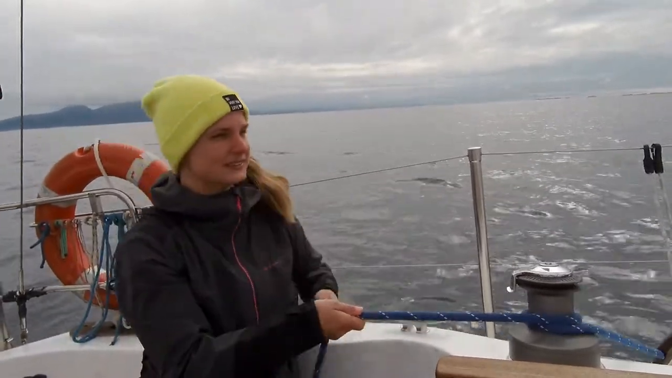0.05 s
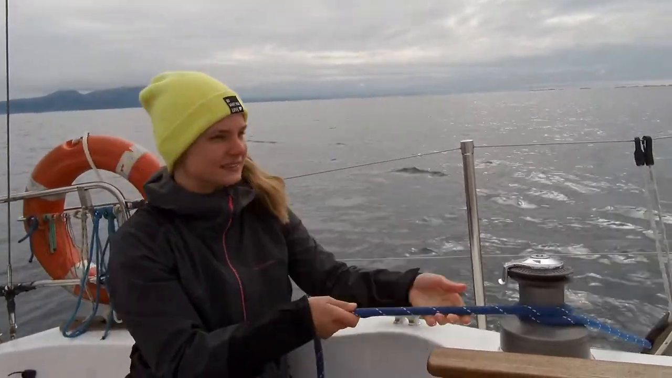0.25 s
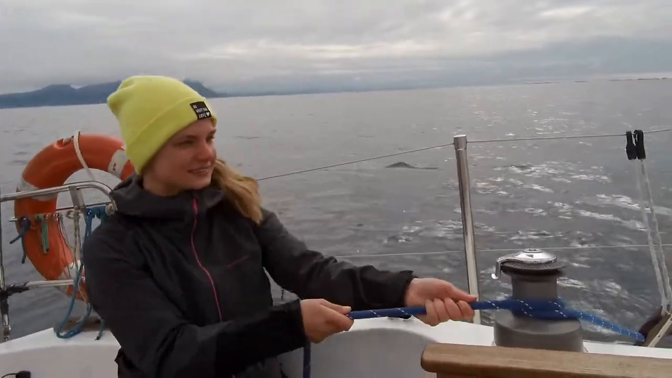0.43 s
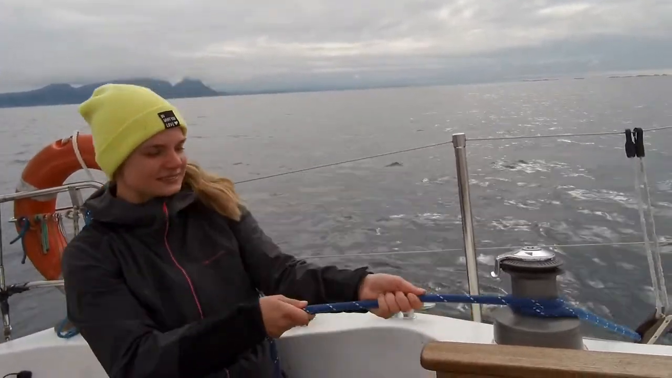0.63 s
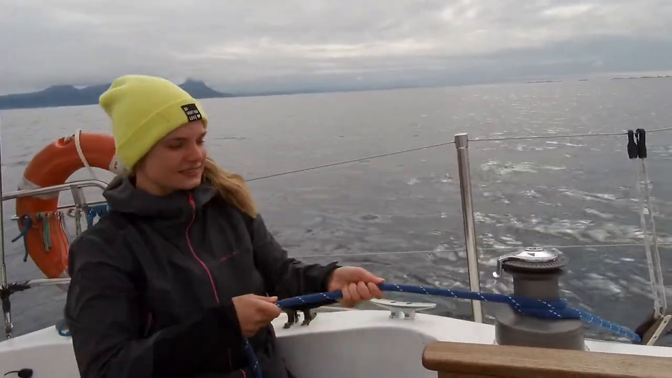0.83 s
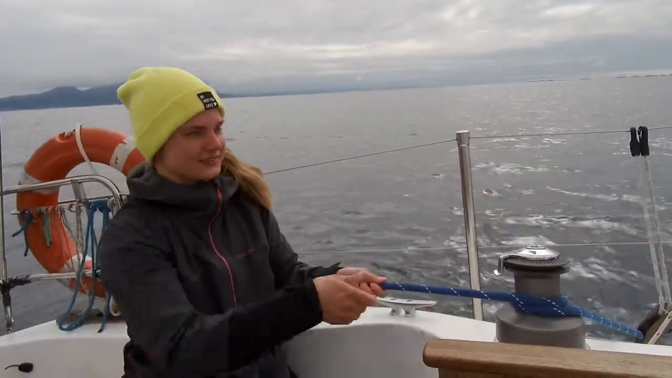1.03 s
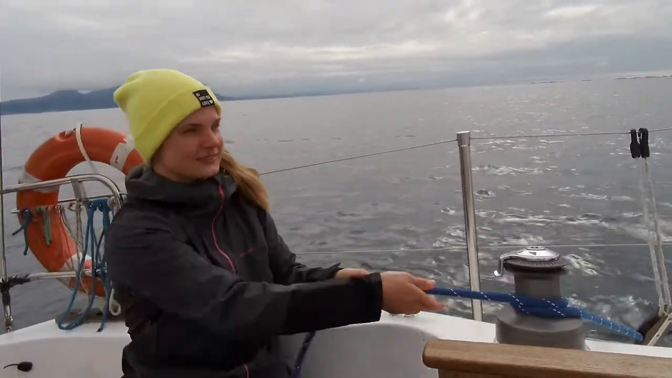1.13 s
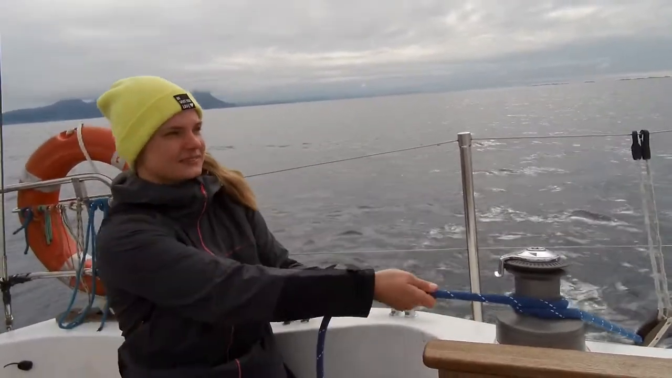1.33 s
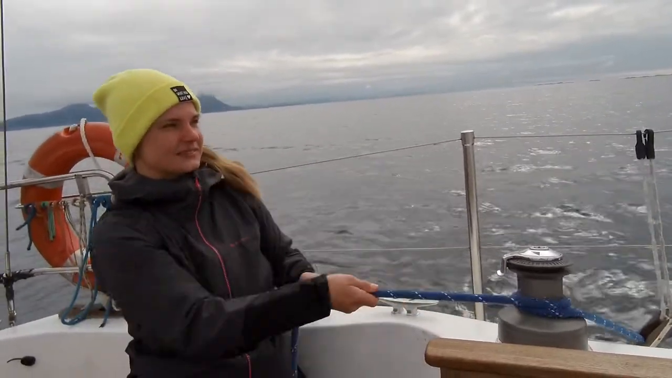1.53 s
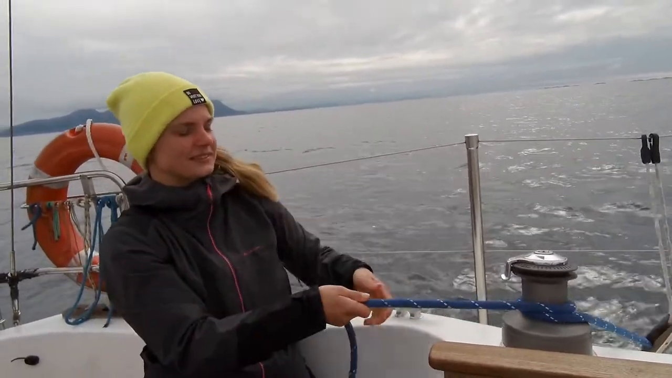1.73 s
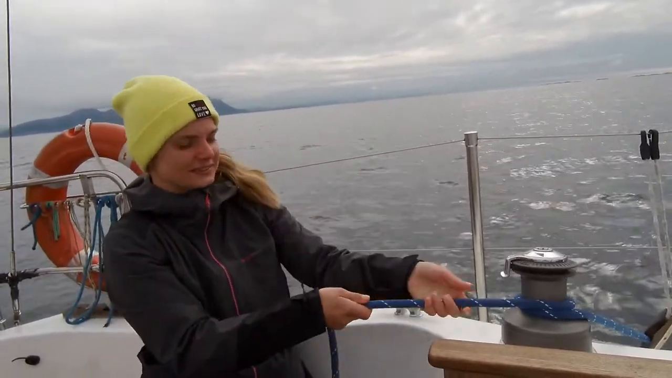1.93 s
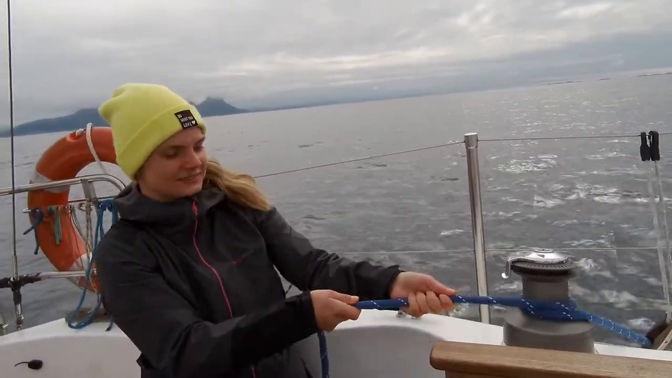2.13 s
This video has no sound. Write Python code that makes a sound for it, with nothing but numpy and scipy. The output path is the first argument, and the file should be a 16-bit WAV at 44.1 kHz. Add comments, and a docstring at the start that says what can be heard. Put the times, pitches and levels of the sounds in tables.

```python
"""Sheet winch on a sailing boat

The winch is hauled in two pulls: pawls click over the teeth, ring the metal drum and knock the hollow deck.
Cracks are short noise bursts; drum and deck are sums of fading sine tones; bearings are grainy noise.
Hands and sleeves rustle along the rope (banded noise), and rope and hull thump (short low tones).
A low engine rumble, a water wash and a faint hiss, all shaped noise, lie under it.
"""
import sys
import numpy as np
from scipy import signal
from scipy.fft import rfft, irfft, next_fast_len
from scipy.io import wavfile
from scipy.ndimage import map_coordinates

SR = 44100
rng = np.random.default_rng(int(sys.argv[2]) if len(sys.argv) > 2 else 0)


def materialize(psi):
    """Save the field psi as 16-bit PCM at rate SR to the path in sys.argv[1].

    A 1-D psi becomes a single channel; in a 2-D psi each row is a channel.
    """
    bounded = np.clip(np.atleast_2d(psi).T, -1, 1)
    quanta = np.round(bounded * 32767).astype(np.int16)
    wavfile.write(sys.argv[1], SR, quanta)


N = 94815


def amp(db):
    """Turn decibels into a plain multiplier."""
    return 10 ** (np.asarray(db) / 20)


def unit(x):
    """Scale x to an rms level of 1."""
    return x / np.sqrt(np.mean(x ** 2) + 1e-20)


def curves(rows, outside_db=-120):
    """Join the rows by straight lines: one value per sample for each column after the time."""
    time_s, *columns = np.transpose(rows)
    return [np.interp(np.arange(N) / SR, time_s, column, outside_db, outside_db) for column in columns]


def wobble(rate):
    """A smooth random curve with `rate` random points a second."""
    points = rng.standard_normal(int(N * rate / SR) + 4)
    return map_coordinates(points, [np.arange(N) * rate / SR])


def filtered(x, response):
    """Weight the frequencies of x by response(frequency in Hz)."""
    m = next_fast_len(len(x) + 8192)  # spare room keeps the filter's tail from wrapping round
    return irfft(rfft(x, m) * response(np.fft.rfftfreq(m, 1 / SR)), m)[:len(x)]


def noise(spectrum, lumpy_db, rate):
    """Noise of rms 1 whose colour follows the spectrum and whose level flutters."""
    f, level_db = np.transpose(spectrum)
    grains = amp(lumpy_db * wobble(rate)) * rng.standard_normal(N)
    colour = lambda hz: amp(np.interp(np.log(hz + 1), np.log(f + 1), level_db))
    return unit(filtered(grains, colour))


def resonances(peaks):
    """A response that boosts narrow bands, as a body does at its own pitches; signs alternate."""
    def response(f):
        total = 0
        for k, (centre, width, db) in enumerate(peaks):
            peak = 1j * f * width / (centre * centre - f * f + 1j * f * width)
            total = total + (-1) ** k * amp(db) * peak
        return total
    return response


def ring(modes, t, rise, scatter_db):
    """A struck body sounds several fading tones, wavering and a little different at each blow."""
    wander_s = 0.00005  # how far the timing of the cycles drifts, so that the pitch wavers
    scatter = rng.standard_normal((len(modes), 3))
    grid = np.meshgrid(np.arange(len(modes)), t * 120, indexing="ij")  # 120 random points a second
    waver = map_coordinates(rng.standard_normal((len(modes), 20)), grid, order=1)
    total = np.zeros(len(t))
    for k, (hz, db, t60) in enumerate(modes):
        louder, sharper, longer = scatter[k]
        level_db = db + scatter_db * (louder / 2 + waver[k])
        fade_db = -60 * t / (t60 * amp(scatter_db * longer / 2))
        cycles = hz * ((1 + 0.004 * sharper) * t + wander_s * waver[-1 - k])
        total += amp(level_db + fade_db) * np.sin(2 * np.pi * cycles)
    return total * (1 - np.exp(-t / rise))


def add(out, s, x):
    """Mix x into out from time s."""
    part = out[max(round(s * SR), 0):][:len(x)]
    part += x[:len(part)]


def background():
    """Lumpy engine rumble with a steady hum, water wash and hiss: each is noise of its own colour."""
    # changing levels: time_s, rumble_db, wash_db, hiss_db
    ground = [(0.0, -32.5, -40.5, -50), (0.16, -38.5, -44.5, -52), (0.29, -38, -46.5, -53),
              (0.56, -32, -43, -50.5), (0.65, -28, -51, -45.5), (0.77, -25.5, -28.5, -40),
              (0.83, -27, -38.5, -43), (0.95, -31.5, -42, -50.5), (1.26, -34, -40.5, -51),
              (1.4, -35.5, -41.5, -54.5), (1.5, -27.5, -56, -43.5), (1.63, -32, -41.5, -49.5),
              (1.81, -35, -46.5, -56.5), (1.93, -34.5, -44.5, -58.5), (2.15, -38.5, -46, -53.5)]
    # colour of the engine rumble: pitch_hz, level_db (per Hz, relative)
    rumble_colour = [(13, -47), (30, -12), (50, -9.5), (87, -1), (113, -10), (167, -6), (264, -9),
                     (296, -9), (338, -21.5), (375, -29), (500, -51), (650, -20), (1100, -120)]
    # colour of the water wash: pitch_hz, level_db (per Hz, relative)
    wash_colour = [(190, -37), (330, -1.5), (1090, -12), (1290, -11), (1380, -12.5), (1770, -22.5),
                   (2500, -30.5), (3250, -57), (5500, -120)]
    # colour of the hiss: pitch_hz, level_db (per Hz, relative)
    hiss_colour = [(1180, -6), (2000, -1.5), (3350, -0.5), (3880, -5), (5110, 0.5), (7200, -1.5),
                   (13500, -2), (15600, -7.5)]
    hum_hz, hum_width_hz, hum_db = 88.8, 7.9, -38.5  # engine hum

    rumble_level, wash_level, hiss_level = amp(curves(ground, outside_db=-45))
    hum = unit(filtered(rng.standard_normal(N), resonances([(hum_hz, hum_width_hz, 0)])))
    rumble = rumble_level * noise(rumble_colour, lumpy_db=2, rate=54)
    wash = wash_level * noise(wash_colour, lumpy_db=4.0, rate=34)
    hiss = hiss_level * noise(hiss_colour, lumpy_db=2, rate=25)
    return rumble + amp(hum_db) * hum + wash + hiss


def rustles():
    """Hands and sleeves rub cloth and rope: grainy noise in two bands, and the sliding rope hums."""
    # one list per rustle: time_s, middle_db, treble_db
    rustle_levels = [
        [(0.0, -63, -61), (0.006, -78, -56), (0.016, -63, -71), (0.032, -98, -59), (0.042, -81, -81),
         (0.05, -44.5, -40), (0.068, -72, -68), (0.08, -77, -60)],
        [(0.17, -67, -71), (0.192, -44, -50), (0.206, -34.5, -31.5), (0.236, -39, -45.5), (0.298, -38.5, -49),
         (0.312, -39, -30), (0.346, -49.5, -58), (0.36, -55, -51)],
        [(0.93, -71, -57), (0.944, -70, -56), (0.956, -78, -44), (0.964, -65, -44), (0.974, -80, -49),
         (0.992, -67, -51.5), (1.004, -79, -58), (1.05, -53.5, -51.5), (1.1, -70, -52.5)],
        [(1.77, -75, -71), (1.782, -65, -76), (1.79, -45, -50), (1.851, -68, -65), (1.855, -38.5, -34.5),
         (1.872, -37, -40), (1.914, -42, -49), (1.936, -54.5, -59), (1.946, -43.5, -46.5), (1.99, -59, -64)],
    ]
    # colour of the middle band: pitch_hz, level_db (per Hz, relative)
    middle_colour = [(290, -53), (500, -80), (662, -11), (1020, -6), (1290, -6.5), (1690, -7.5),
                     (2960, -10.5), (3220, -8), (6000, -15), (7800, -55), (13200, -120)]
    # colour of the treble band: pitch_hz, level_db (per Hz, relative)
    treble_colour = [(3240, -17), (5500, -1), (7210, 0.5), (7870, 5), (9210, 1.5), (10600, 2.5),
                     (15600, -7.5)]
    rope_hz, rope_width_hz, rope_db = 664, 24, -4  # hum level is relative to the middle band

    middle = noise(middle_colour, lumpy_db=1.7, rate=400)
    rope = unit(filtered(rng.standard_normal(N), resonances([(rope_hz, rope_width_hz, 0)])))
    middle = middle + amp(rope_db) * rope
    treble = noise(treble_colour, lumpy_db=1.7, rate=500)
    return sum(amp(mid_db) * middle + amp(top_db) * treble for mid_db, top_db in map(curves, rustle_levels))


def thumps():
    """Rope and hull thump: a low fading tone with a sharp first dip, and a dull slap of noise."""
    # thumps of rope and hull: start_s, push_db, pitch_hz, slap_db (of half the slap's peak)
    thump_list = [(0.014, -28, 170, -28), (0.058, -40, 122, -36), (0.216, -31, 276, -51),
                  (0.248, -28, 187, -51), (0.383, -21.5, 151, -42.5), (0.519, -21.5, 125, -39),
                  (0.944, -26, 198, -32), (0.9626, -15, 298, -30.5), (1.0138, -19.5, 390, -43),
                  (1.051, -27, 121, -32.5), (1.152, -39, 118, -40), (1.184, -10, 124, -39),
                  (1.249, -20.5, 201, -50), (1.275, -21.5, 122, -27.5), (1.334, -19, 143, -28),
                  (1.464, -17, 118, -52), (1.766, -31, 277, -41), (1.949, -34.5, 208, -33.5),
                  (2, -32, 209, -61)]
    fade_cycles = 4  # the tone fades by 30 dB in this many cycles
    jolt_cycles, jolt_db = 0.13, -3.5  # width of the first dip, and its depth relative to the tone
    slap_t60_s, slap_hz = 0.036, 1070  # time to fade by 60 dB, and where the treble starts to fall

    out, t = np.zeros(N), np.arange(SR // 10) / SR
    for s, push_db, hz, slap_db in thump_list:
        tone = np.sin(2 * np.pi * (hz * t - 3 * jolt_cycles))
        push = tone * amp(-30 * t * hz / fade_cycles) * (1 - np.exp(-t / 0.0019))
        u = t * hz / jolt_cycles - 3  # distance from the middle of the dip, in widths
        push = push - amp(jolt_db) * (1 - u ** 2) * np.exp(-u ** 2 / 2)
        burst = amp(-60 * t / slap_t60_s) * rng.standard_normal(len(t))
        slap = filtered(burst, lambda f: 1 / (1 + 1j * f / slap_hz) ** 3)
        add(out, s, amp(push_db) * push + amp(slap_db) * 2 * slap / np.abs(slap).max())
    return out


def bearings():
    """The turning drum rolls on its bearings: grainy noise coloured by deck and drum, plus hiss."""
    # one list per turn of the drum: time_s, level_db
    turns = [
        [(0.59, -40), (0.754, -22.5), (0.838, -35), (0.92, -46)],
        [(1.41, -57), (1.468, -34), (1.55, -24.5), (1.68, -35)],
    ]
    # tones of deck and drum that the rolling excites: pitch_hz, width_hz, level_db (relative)
    body_peaks = [(396, 32.4, 2), (547, 27, -2.5), (752, 58, -7), (1140, 29, -9.5), (1345, 51, -9.5),
                  (1444, 78, -9), (1542, 61, -7), (3080, 54, -38), (6940, 55, -19.5), (11270, 240, -22.5)]
    hiss_db = -16.5  # relative to the coloured noise

    def grit():
        return amp(6.9 * wobble(150)) * rng.standard_normal(N)

    body = unit(filtered(grit(), resonances(body_peaks)))
    hiss = unit(np.diff(grit(), prepend=0))  # differences between samples favour the treble
    level = sum(amp(curves(rows)[0]) for rows in turns)
    return level * (body + amp(hiss_db) * hiss)


def drum():
    """A short gritty scrape excites the drum's tones, which are damped after the length of each ring."""
    # rings of the drum: start_s, level_db, upper_over_lower_db, middle_db, length_s
    ring_list = [(0.675, -26, 15, -26, 0.0097), (0.693, -22, -11, -19, 0.015),
                 (0.734, -24.5, 6.5, -23.5, 0.027), (0.743, -23, -22, -25, 0.024),
                 (0.762, -33.5, 15, -20, 0.025), (0.788, -22, 11, -23, 0.004),
                 (0.804, -19, -9, -23.5, 0.014), (0.831, -28, -8, -26, 0.012),
                 (.855, -22.5, 0.5, -26.5, 0.016), (1.339, -37, 1, -29, 0.0058),
                 (1.529, -24, -4, -21.5, 0.0035), (1.551, -33, 0, -31, 0.012),
                 (1.564, -33.5, 6.5, -37, 0.021), (1.602, -34, -15, -34, 0.009),
                 (1.64, -28, -9, -28, 0.014), (1.708, -50, -3, -34, 0.005), (2.008, -44, -3, -38, 0.005)]
    # high tones: pitch_hz, level_db (relative), t60_s (fade by 60 dB), share (of upper_over_lower_db)
    high_modes = [(3020, -13.5, 0.041, 0), (3760, -18, 0.14, 0.33), (4340, -18, 0.3, 0.18),
                  (5226, -2.5, 0.093, 0.035), (5370, -5, 0.05, 0.15), (7065, -6.5, 0.11, 0.68),
                  (7120, -10.5, 0.037, 0.65), (9000, -12.5, 0.062, 0.18), (9900, -16, 0.037, 0.7),
                  (11200, -17, .04, 0.3), (5620, -9.5, 0.025, 0.043), (3590, -16.5, 0.14, 0.67),
                  (6590, -5.5, 0.023, 0.46)]
    # middle tones: pitch_hz, level_db (relative), t60_s (fade by 60 dB)
    middle_modes = [(1317, 2.5, 0.074), (1426, 5, 0.031), (1578, -3, 0.039), (1140, -6, 0.03),
                    (2124, -11, 0.038)]
    rise_s, damp_s, damped_db = 0.002, 0.004, -7  # swelling time, damping time, drop once damped
    scrape_s, scrape_db = 0.003, -14  # strike's fading time; friction noise relative to the ring's level

    out, t = np.zeros(N), np.arange(SR // 8) / SR
    for s, level_db, upper_db, mid_db, length in ring_list:
        tuned = [(hz, db + share * upper_db, t60) for hz, db, t60, share in high_modes]
        high = ring(tuned, t, rise_s, scatter_db=3.0)
        middle = ring(middle_modes, t, rise_s, scatter_db=2.5)
        modes = amp(level_db) * high + amp(mid_db) * middle
        grit = rng.standard_normal((2, len(t)))
        strike = grit[0] ** 3 * np.exp(-t / scrape_s)  # cubing makes a few grains stand out
        struck = signal.fftconvolve(modes, strike / np.linalg.norm(strike))[:len(t)]
        friction = grit[1] * np.exp(-t / length) * (1 - np.exp(-t / rise_s))
        friction = amp(scrape_db + level_db) * friction
        damp = amp(damped_db * (1 - np.exp(-np.maximum(t - length, 0) / damp_s)))
        add(out, s, (modes + struck / 2 + friction) * damp)
    return out * amp(1.4 * wobble(250))  # the level flickers


def pawls():
    """Each click is a short crack of its own colour, then the hollow deck swells and rings."""
    # pawl clicks and a few faint rope ticks:
    # start_s, crack_swing_db (lowest to highest point), knock_db, tilt_db_per_octave, strongest_pitch_hz
    click_list = [(0.597, -24.5, -45, 17, 7160), (0.6204, -11.5, -36, -8, 2500),
                  (0.6236, -24, -16.5, -21, 2860), (0.6364, -32, -29, -3, 2530),
                  (0.6452, -17, -50, 3, 11200), (0.6488, -14.5, -18, -16, 2940),
                  (0.6596, -17, -24, 1, 12800), (0.6645, -6.5, -14.5, -10, 3100),
                  (0.6875, -12.5, -13, -1, 5210), (0.7112, -9.5, -15.5, -6.5, 4300),
                  (0.7291, -8.5, -19.5, -6.5, 7100), (0.7447, -25, -23, 3, 5230),
                  (0.7526, -29, -30.5, -7, 7070), (0.7795, -9, -25, -11.5, 3330),
                  (0.7909, -8.5, -49, -1, 6600), (0.8124, -25, -42, 2, 5360),
                  (0.8477, -14.5, -14.5, -7.5, 5360), (0.8863, -29, -37, -5, 5210),
                  (0.9012, -23.5, -40, -1, 5220), (1.1543, -29, -29, -6, 4160),
                  (1.3278, -28, -33, -2, 5160), (1.3644, -25, -37, -3, 4430), (1.4133, -21, -57, 6, 11200),
                  (1.4339, -11.5, -19.5, -10.5, 2630), (1.4378, -17, -31.5, -2, 2900),
                  (1.4561, -27, -38, 5, 11100), (1.4771, -14.5, -21, -9, 3100), (1.482, -23, -51, 4, 11500),
                  (1.494, -12, -17.5, -4.5, 3000), (1.506, -9.5, -23.5, -4, 4360),
                  (1.5222, -10.5, -17.5, -4.5, 5650), (1.5442, -11.5, -18, -7, 2790),
                  (1.5528, -14.5, -37, -7, 11600), (1.578, -18, -52, -3, 7060),
                  (1.5971, -14.5, -21, -10.5, 5300), (1.6362, -16.5, -19, -4, 5600),
                  (1.751, -30, -55, 0, 5040), (1.854, -17.5, -57, -7.5, 3300),
                  (2.0425, -32.5, -62, -2, 5000), (2.1404, -23.5, -52, 6, 11400)]
    # tones of the deck, plus one long drum tone (2184 Hz) that is never damped: pitch_hz, level_db (relative),
    # t60_s (fade by 60 dB)
    deck_modes = [(391.4, 8, 0.051), (350.6, 5, 0.037), (539.5, -8, 0.12), (792, -1.5, 0.031),
                  (124.5, -5, 0.12), (2184, -29, 0.33)]
    knock_rise_s, knock_lag_s = 0.0037, 0.002516  # the deck swells slowly, a little after the crack
    crack_rise_s, crack_t60_s = 0.0001, 0.012
    peak_db, peak_q = 4.5, 18  # added resonance at the strongest pitch; a higher q is narrower
    low_hz, top_hz = 910, 13800  # the crack fades out below and above these

    out, t = np.zeros(N), np.arange(SR // 8) / SR
    for s, crack_db, knock_db, tilt, peak_hz in click_list:
        bump = resonances([(peak_hz, peak_hz / peak_q, peak_db)])

        def colour(hz):
            slope = amp(tilt * np.log2((hz + 300) / 5000))
            bass_cut = (1j * hz / (1j * hz + low_hz)) ** 2
            treble_cut = 1 / (1 + (hz / top_hz) ** 10)
            return slope * (1 + bump(hz + 1)) * bass_cut * treble_cut

        envelope = amp(-60 * t / crack_t60_s) * (1 - np.exp(-t / crack_rise_s))
        crack = filtered(envelope * np.tanh(2 * rng.standard_normal(len(t))), colour)
        add(out, s, amp(crack_db) * crack / np.ptp(crack))
        knock = ring(deck_modes, t, knock_rise_s, scatter_db=4.0)
        add(out, s + knock_lag_s, amp(knock_db) * knock)
    return out


def scene():
    """All layers sound together in one channel."""
    return (background() + rustles() + thumps() + bearings() + drum() + pawls())[None]


def record(dry):
    """The microphone rolls off the lowest bass, and nothing passes above the band limit."""
    low_hz, top_hz = 25.5, 15400
    return filtered(dry[0], lambda hz: (1j * hz / (1j * hz + low_hz)) ** 2 * (hz < top_hz))[None]


dry = scene()
out = record(dry)
materialize(out)
```